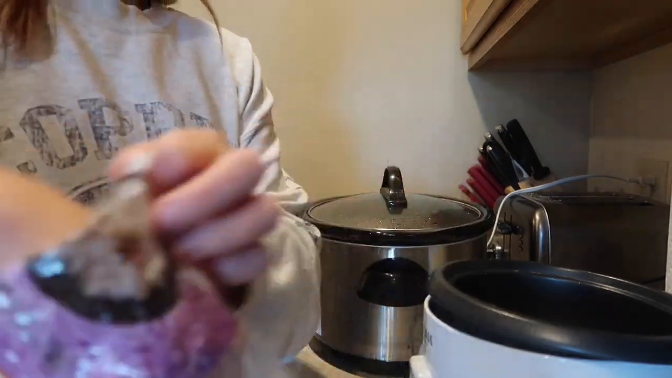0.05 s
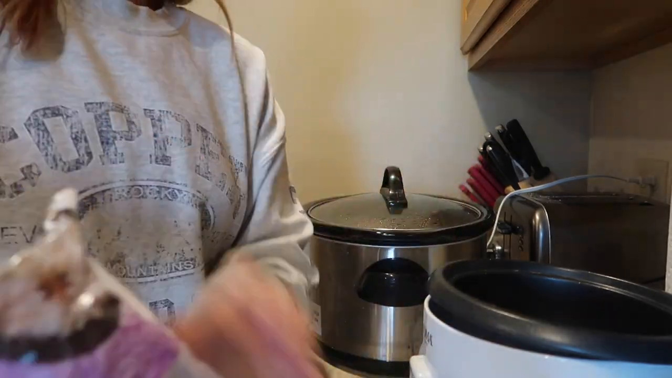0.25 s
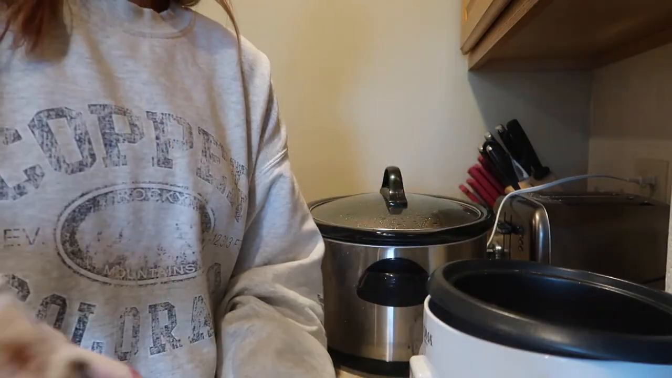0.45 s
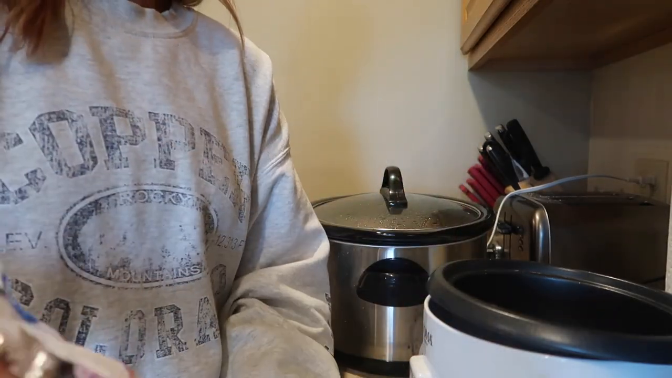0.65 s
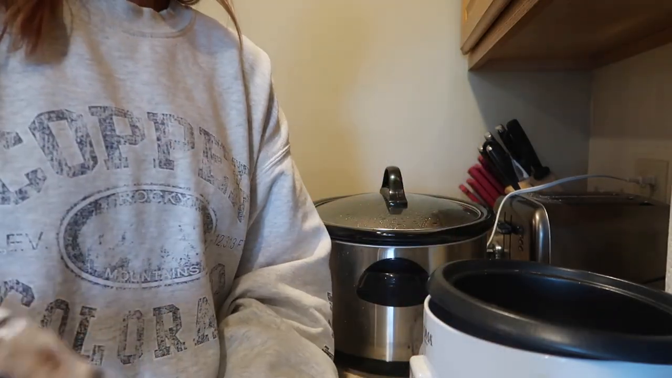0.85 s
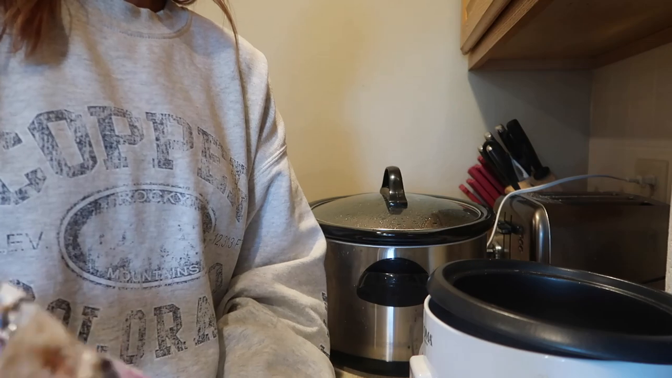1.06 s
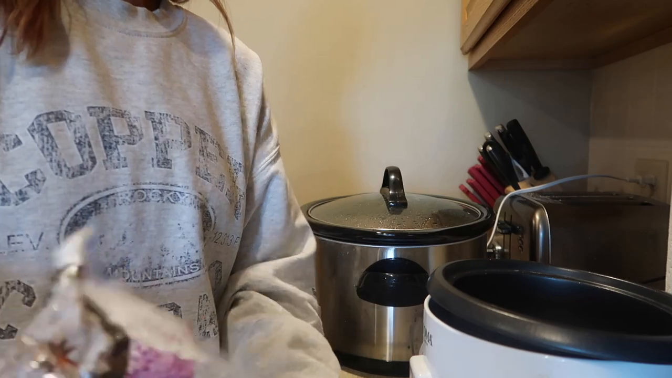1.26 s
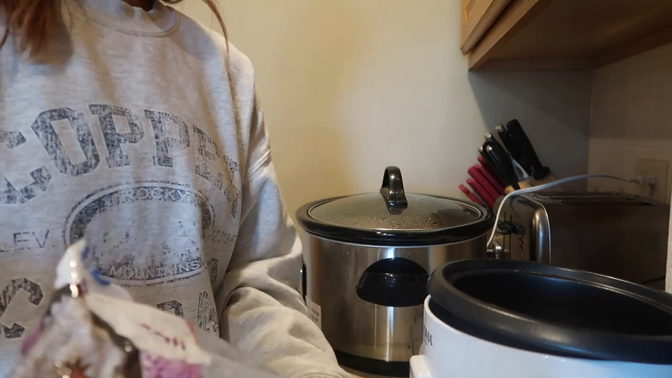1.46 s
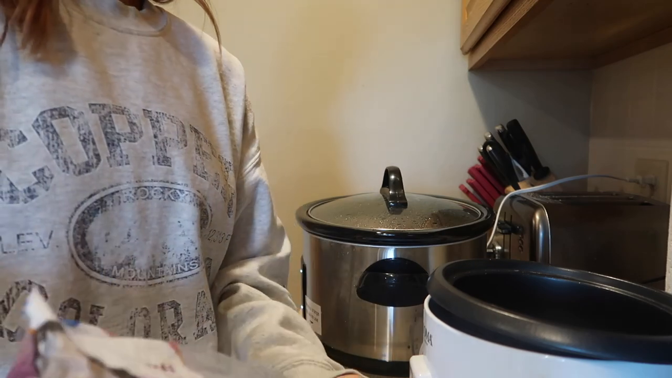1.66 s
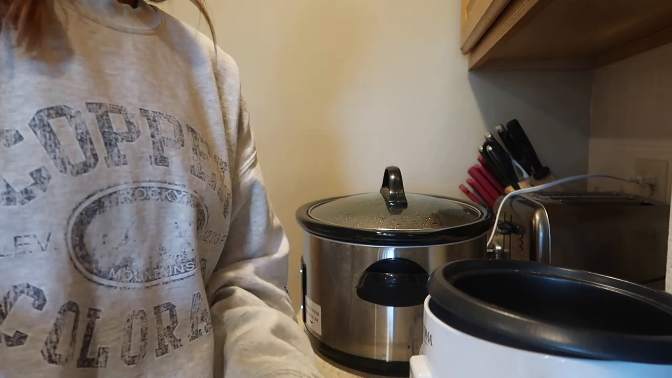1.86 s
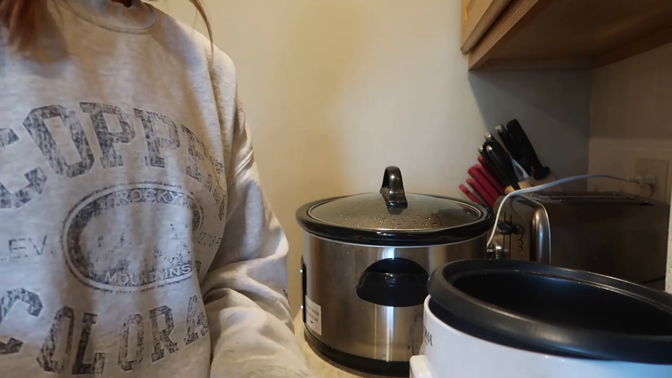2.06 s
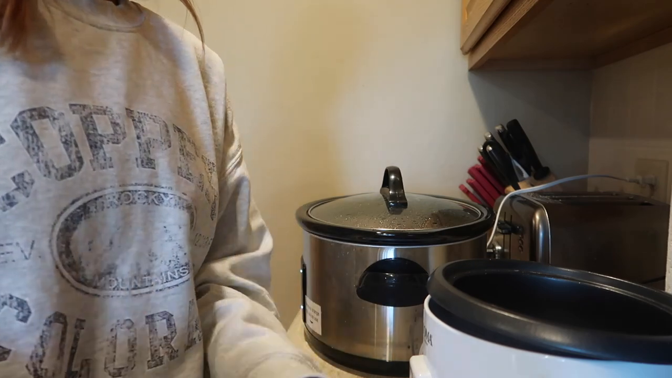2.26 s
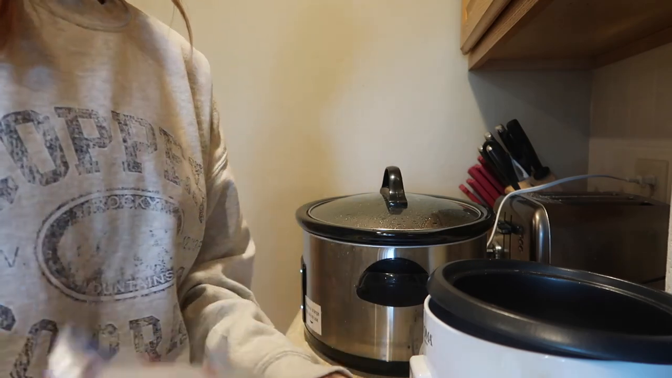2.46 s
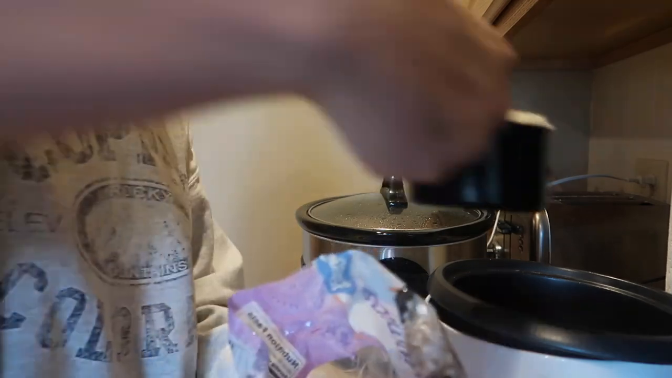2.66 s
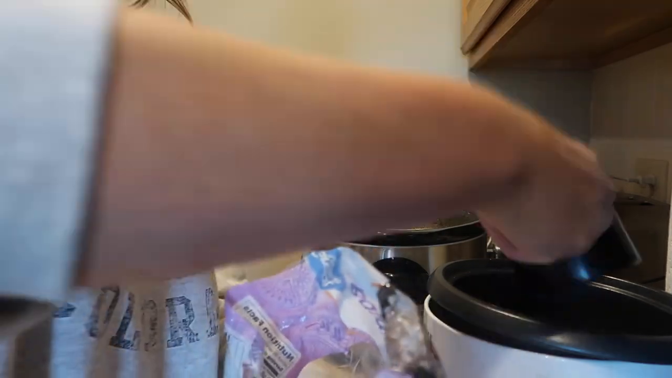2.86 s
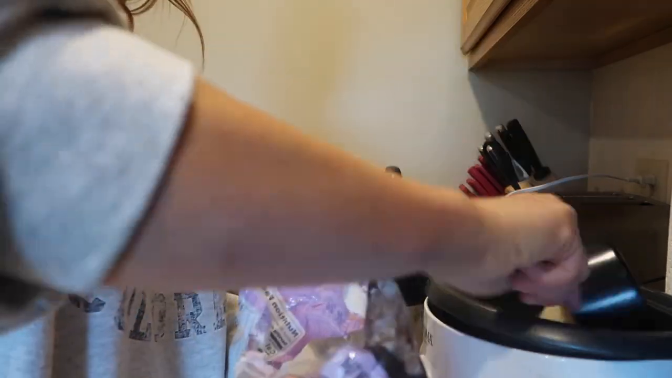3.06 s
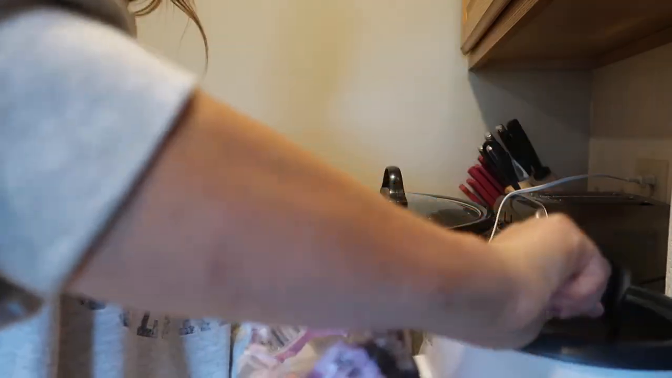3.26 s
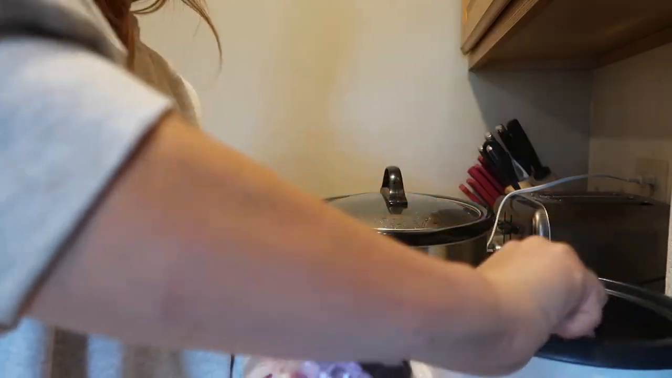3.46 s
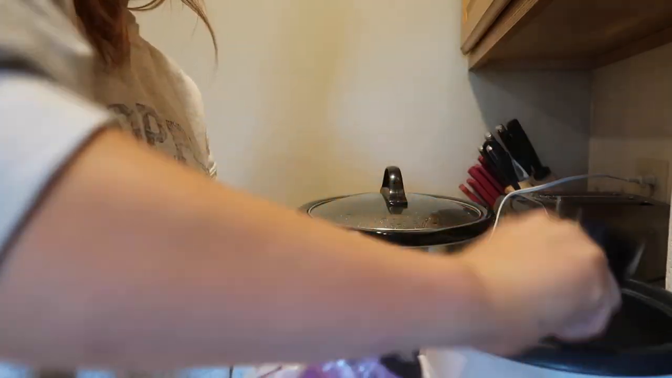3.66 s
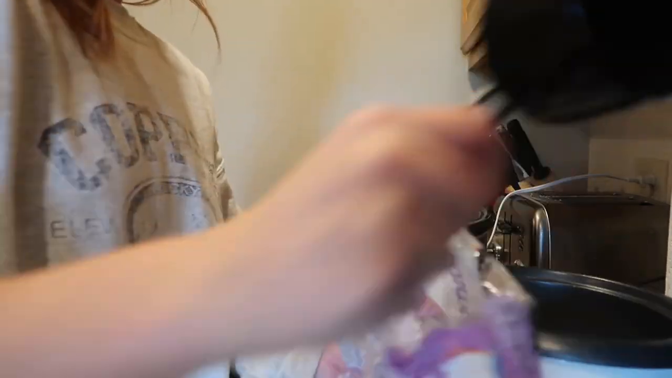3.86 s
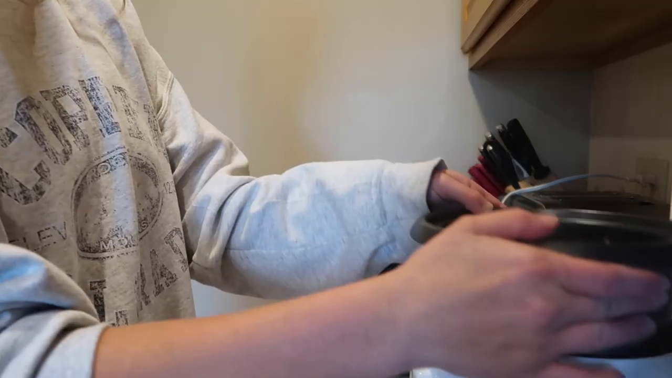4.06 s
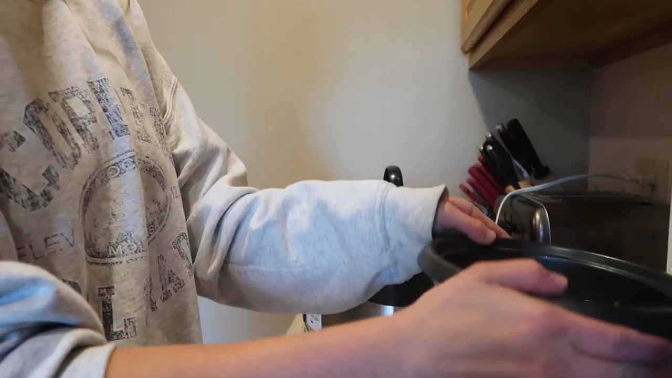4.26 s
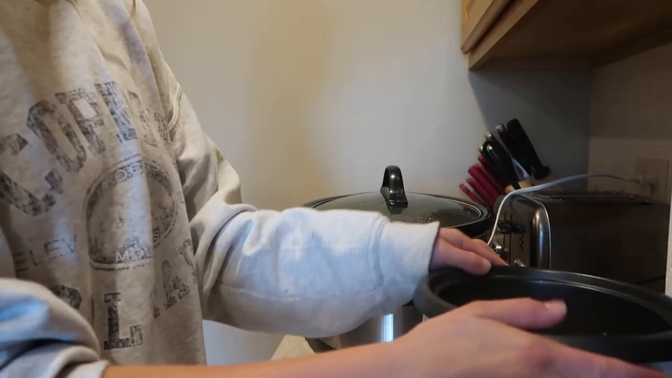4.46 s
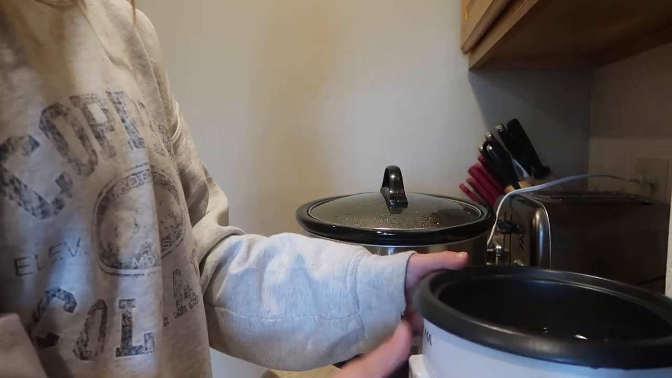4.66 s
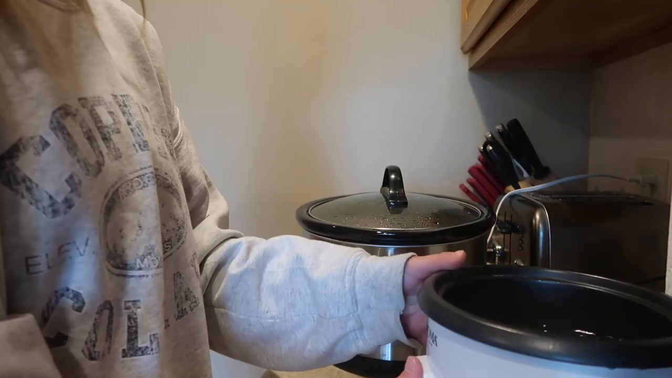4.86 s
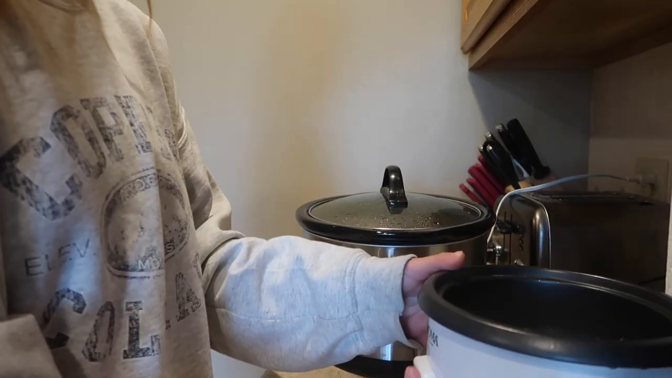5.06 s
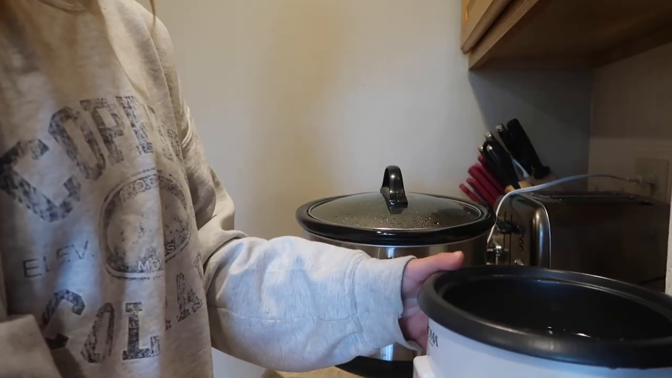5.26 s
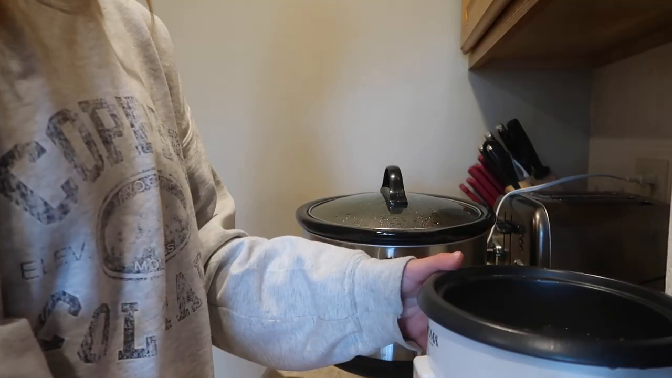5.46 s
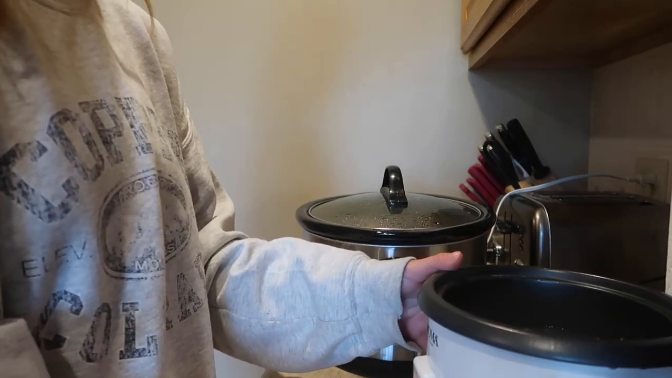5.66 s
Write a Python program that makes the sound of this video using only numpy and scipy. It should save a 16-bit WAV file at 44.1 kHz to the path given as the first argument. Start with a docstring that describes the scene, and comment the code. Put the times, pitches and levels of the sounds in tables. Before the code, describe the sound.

Close in a small kitchen, a stiff plastic bag of dry rice crackles, snaps and creaks for almost three seconds as a cup digs in the churning grains. One quick cupful rattles into a metal pot with a faint ring. The cup taps and clatters down, then the pot drops into its cooker with clanks and a low thud. Sparse light touches and a final knock follow over faint air and hum.

```python
"""A plastic bag of dry rice crinkles and creaks from clicks, buckling facets and stick-slip, as a cup digs in it.
At 3 s the cupful falls into the metal pot of a rice cooker: showers of tiny impacts ring its modes, then land dull.
The cup taps the rim, the last grains hiss out, and the cup is put down with noise cracks and short rings.
From 4 s the pot is lifted and dropped back into its housing: a clank of noise and modes, and a low-passed thud.
A hand slides on the shell before a last knock; faint room air and an appliance's hum last throughout."""
import sys
import numpy as np
from scipy import signal
from scipy.fft import rfft, irfft
from scipy.io import wavfile
from scipy.ndimage import uniform_filter1d

SR = 44100
rng = np.random.default_rng(int(sys.argv[2]) if len(sys.argv) > 2 else 0)


def materialize(psi):
    """Save the field psi as 16-bit PCM at rate SR to the path in sys.argv[1].

    A 1-D psi becomes a single channel; in a 2-D psi each row is a channel.
    """
    bounded = np.clip(np.atleast_2d(psi).T, -1, 1)
    quanta = np.round(bounded * 32767).astype(np.int16)
    wavfile.write(sys.argv[1], SR, quanta)


N = 251370
TIME = np.arange(N) / SR  # s


# how bright the film sounds: (f/Hz, level/dB)
FILM_SPECTRUM = [(300, -3), (700, -1.5), (1100, -4), (2200, 2.5), (3200, -4), (4500, -12.5), (7000, -20),
                 (10000, -33.5), (12500, -88.5), (15500, -78)]
# how the churning rice sounds: (f/Hz, level/dB)
CHURN_SPECTRUM = [(150, -25.5), (250, -5), (380, 2.5), (520, 3.5), (660, 8), (800, -5), (1100, 1),
                  (1800, -60)]
# the low rumble of the hands: (f/Hz, level/dB)
RUMBLE_SPECTRUM = [(25, -19.5), (55, -10), (90, -8.5), (135, 5), (190, 3.5), (260, -20.5), (500, -70)]


def bag():
    """The film crackles and pops; the rice churns under the cup and its shifting weight rumbles."""
    film_gain, rice_gain = effort()
    creases = crackle(rate=850, spread_db=2.0, spectrum=FILM_SPECTRUM, patchy_db=3.5)
    creases = creases + undb(2.5) * pops(pitch_hz=2110, octaves=0.47, spread_db=4.0)
    rice = undb(-2.0) * crackle(rate=1100, spread_db=6.5, spectrum=CHURN_SPECTRUM, patchy_db=3.5)
    rumble = undb(-13.0) * unit(colour(rng.standard_normal(N), RUMBLE_SPECTRUM))
    fits = undb(1.53 * walk(TIME, 110))  # the film yields in fits and starts
    return undb(-1.0) * film_gain * fits * creases + rice_gain * (rice + rumble)


# the hand's light, steady work on the bag between squeezes: (t/s, crackle level/dB)
HANDLING = [(0.0, -23.5), (0.37, -39.5), (0.46, -31), (1.03, -32.5), (2.3, -27), (2.58, -30), (2.68, -45),
            (3.04, -47)]
HANDLING_RICE_DB = -3.5  # rice gain relative to the film gain
# the bag is squeezed or dug into:
# (start t/s, time from start to fall t/s, crackle level/dB, rice level relative to it/dB)
SQUEEZES = [(0.0, 0.12, -24, -40), (0.17, 0.056, -22.5, -28), (0.292, 0.0094, -28.5, -8),
            (0.563, 0.056, -25.5, -8), (0.759, 0.052, -18.5, -13), (0.85, 0.12, -25.5, -3.5),
            (1.064, 0.083, -33.5, 13.5), (1.312, 0.1, -27.5, -2), (1.524, 0.02, -26, 0.5),
            (1.619, 0.15, -24.5, -2.5), (1.913, 0.011, -22, -13), (2.038, 0.18, -28, 2),
            (2.391, 0.052, -27, 1), (2.433, 0.0078, -30.5, 5.5), (2.736, 0.0038, -22.5, -0.5),
            (2.971, 0.064, -39.5, 6), (3.671, 0.033, -29.5, -1.5), (3.73, 0.16, -33, -7.5),
            (3.914, 0.02, -31, 0.5)]
SQUEEZE_ATTACK_S, SQUEEZE_FALL_DB_PER_S = 0.0029, 353


def effort():
    """Gains of film and rice: steady handling with every squeeze on top, added in power."""
    steady = gain_curve(HANDLING)
    film_power = steady ** 2
    rice_power = (undb(HANDLING_RICE_DB) * steady) ** 2
    for s, hold, db, rice_db in SQUEEZES:
        squeeze = swell(s, hold, db, SQUEEZE_ATTACK_S, SQUEEZE_FALL_DB_PER_S)
        film_power = film_power + squeeze ** 2
        rice_power = rice_power + (undb(rice_db) * squeeze) ** 2
    return np.sqrt(film_power), np.sqrt(rice_power)


def pops(pitch_hz, octaves, spread_db, count=900):
    """Small facets of every size flip at random moments."""
    out = np.zeros(N)
    times = rng.random(count) * N / SR
    for s, (width, strength) in zip(times, rng.standard_normal((count, 2))):
        hz = np.clip(pitch_hz * 2 ** (octaves * width), 500, 7000)
        add(out, s, undb(spread_db * min(strength, 2)) * facet(hz, cycles=11))
    return out


def facet(hz, cycles, size=2048):
    """A patch of film flips over and swings for a few cycles."""
    swing = np.sin(2 * np.pi * hz * TIME[:size])
    soft_start = 1 - fade(0.0017, size)
    return crest(fade(cycles / hz, size) * swing * soft_start)


# the loudest creases snapping through: (t/s, level/dB, f/Hz, sharp tick level/dB)
SNAPS = [(0.044, -11, 2520, 5), (0.101, -3, 2670, -19), (0.106, -10, 2390, -18), (0.164, -3.5, 2860, -21),
         (0.191, -4.5, 2160, -14), (0.218, 0, 2290, -4.5), (0.301, -10, 2460, 6.5), (0.333, -22, 2430, 12),
         (0.395, -10.5, 2180, 15), (0.772, -5, 2320, -19), (0.794, -2, 1570, -22), (0.932, -7.5, 2300, 8.5),
         (0.956, 2, 2480, -20), (0.981, -10, 1530, 5), (1.073, -7, 2030, -9.5), (1.089, 2, 2190, -25),
         (1.212, -10, 2400, -14), (1.365, -2, 2230, -22), (1.517, -6.5, 2200, -32),
         (1.536, -4.5, 2300, -11), (1.658, -1, 2430, -10), (1.7145, -8.5, 1970, -12), (1.743, -6, 2270, -3),
         (1.749, -2.5, 2320, -21), (1.757, -6, 2440, -32), (1.855, -1.5, 2450, 2.5), (1.929, -1, 2450, 8),
         (1.943, -8.5, 2200, 0), (1.976, -9.5, 2090, -3), (2.032, -3, 2110, -5), (2.042, -12, 2500, 16.5),
         (2.067, 2, 2840, -30), (2.102, -6.5, 2490, -30), (2.127, -2.5, 1970, -27), (2.161, -5.5, 2020, 3),
         (2.168, -16, 2330, 19), (2.23, -7, 2070, -2), (2.272, -10.5, 2500, 3), (2.385, -15, 2640, 16),
         (2.413, -3.5, 2670, -1), (2.447, 2.5, 2980, -10), (2.761, -4.5, 2730, -30),
         (2.821, -12.5, 1930, -3.5), (2.979, -14.5, 2670, -14.5)]
REBOUND_S, REBOUND_DB = 0.004, -14  # time scale of the flick back; its level on top of the snap's


def snaps(size=2048):
    """A crease buckles: its facet swings, the edge ticks, it flicks back detuned and neighbours follow."""
    out = np.zeros(N)
    tick_spectrum = [(200, -1.0), (900, 5.5), (3000, -2.5), (6000, -11.5), (10000, -18.5), (15000, -46.0)]
    for s, db, hz, tick_db in SNAPS:
        tick = rng.standard_normal(size) * fade(0.007, size)
        sharp = crest(colour(tick, tick_spectrum))
        neighbours = crest(colour(rng.standard_normal(size) * fade(0.012, size), FILM_SPECTRUM))
        snap = facet(hz, cycles=12.4) + undb(tick_db - 4.0) * sharp + undb(-5.5) * neighbours
        add(out, s + 0.0005, undb(db - 5.5) * snap)
        wait, detune = rng.uniform(0.459, 1.8), rng.standard_normal()
        rebound = facet(hz * 2 ** (0.41 * detune), cycles=4.1)
        add(out, s + REBOUND_S * wait, undb(db + REBOUND_DB) * rebound)
    return out


# taut film creaks as it drags, and once a fingertip on the pot:
# (start t/s, time from start to fall t/s, level/dB, f/Hz, glide/octaves per s)
CREAKS = [(0.168, 0.053, -25.5, 406.4, -2.5), (0.529, 0.058, -27, 1075, 0.2), (0.91, 0.035, -27, 1075, -1),
          (4.96, 0.077, -62.5, 2090, 0)]
CREAK_SLIPS_PER_S, CREAK_CYCLES = 590, 30  # mean slip rate; cycles until a slip's ring is 60 dB down


def creaks(size=8192, count=120):
    """A dragged surface sticks and slips; each slip plucks one tight resonance, gliding with tension."""
    out = np.zeros(N)
    t = TIME[:size]
    for s, hold, db, hz, glide in CREAKS:
        waits, strengths = rng.uniform(0.4, 1.6, (2, count))
        at = (np.cumsum(waits) / CREAK_SLIPS_PER_S * SR).astype(int)
        wandering_phase = np.exp(1j * 0.72 * walk(t, 250))
        slips = np.bincount(at, strengths, size)[:size] * wandering_phase
        swing = signal.fftconvolve(slips, fade(CREAK_CYCLES / hz, size))[:size]
        carrier = np.exp(2j * np.pi * np.cumsum(hz * 2 ** (glide * t)) / SR)
        tone = unit(np.real(swing * carrier))
        add(out, s, tone * swell(0, hold, db, attack_s=0.026, fall_db_per_s=554)[:size])
    return out


# the high metallic resonances under the grains: (f/Hz, level/dB, time to fall 60 dB t/s)
METAL_MODES = [(3270, 4, 0.13), (3775, 3, .11), (4730, 0, 0.1), (5970, -2, 0.2), (5900, -3, 0.14),
               (7100, 1, 0.14), (8500, -10, .12), (10989, -8, 0.16)]
# the grains' patter on the wall, in its broad resonances: (f/Hz, level/dB)
PATTER_SPECTRUM = [(500, -23), (1250, -1), (1700, -7.5), (2300, -0.5), (2900, -1.5), (3750, 4.5),
                   (4200, -9.5), (4850, -2.5), (5400, -13), (6000, -6), (6600, -12), (15000, -48)]
# grains ticking on each other: (f/Hz, level/dB)
TICKS_SPECTRUM = [(3000, -3), (5200, 3), (6500, 6.5), (9000, 7.5), (12300, 6), (13500, -14), (15500, -45.5)]
# a tap on the rim shakes a clump onto the heap: (start t/s, time from start to fall t/s, level/dB)
CLUMP = (3.337, 0.029, -33.5)
# the cupful falls at once, then thins out
POUR_START_S, POUR_ATTACK_S, POUR_HOLD_S, POUR_FALL_DB_PER_S = 3.05, 0.00043, 0.018, 93
# drive at full flow, ahead of the layers' mix levels: on bare metal, on each other, on the heap
METAL_DB, TICKS_DB, HEAP_DB = -19.5, -24.5, -11
# the heap covers the bottom of the pot
HEAP_FORMS_S, HEAP_GROWS_S, HEAP_MUFFLES_DB = 3.118, 0.011, -2.5


def pour():
    """Grains rain on bare metal and ring the pot, then land duller on their own heap."""
    flow = swell(POUR_START_S, POUR_HOLD_S, 0, POUR_ATTACK_S, POUR_FALL_DB_PER_S)
    covered = np.clip((TIME - HEAP_FORMS_S) / HEAP_GROWS_S, 0, 1)
    bare = flow * undb(HEAP_MUFFLES_DB * covered)
    metal = undb(METAL_DB) * bare
    ticks = undb(TICKS_DB) * bare
    clump = swell(*CLUMP, attack_s=0.0045, fall_db_per_s=350)
    heap = undb(HEAP_DB) * covered * flow ** 1.76 + clump
    impacts = metal * crackle(rate=3000, spread_db=-3.5, spectrum=[(500, -2), (13000, -0.089)])
    pot = ring(METAL_MODES)
    ringing = signal.fftconvolve(impacts, pot / np.linalg.norm(pot))[:N]
    patter = metal * crackle(rate=1500, spread_db=0.5, spectrum=PATTER_SPECTRUM, patchy_db=4.0)
    ticking = ticks * crackle(rate=2200, spread_db=1.0, spectrum=TICKS_SPECTRUM)
    landing = heap * crackle(rate=2700, spread_db=4.5, spectrum=CHURN_SPECTRUM)
    return undb(-12.5) * ringing + undb(-2.0) * patter + undb(-4.0) * ticking + undb(-5.5) * landing


# the landing heap and the cup's tap set the wall singing: (t/s, level/dB)
WALL_HITS = [(3.141, -42.5), (3.339, -49)]
# the pot's wall, ringing like a faint bell: (f/Hz, level/dB, time to fall 60 dB t/s)
WALL_MODES = [(1340, -2, 0.88), (1605, 5, 0.6), (1760, -4, 1.7), (2890, -9, 2.6)]
# the pot is not quite round: each mode beats with a weaker twin
WALL_BEAT_HZ, WALL_TWIN_DB = 9, -3  # mean beat rate; twin relative to its mode


def pot_wall(size=44100):
    """The pot's thin wall sings on faintly, beating, in a different mix after each hit."""
    out = np.zeros(N)
    for s, db in WALL_HITS:
        modes = [(hz, level + 2 * rng.standard_normal(), t60) for hz, level, t60 in WALL_MODES]
        twins = [(hz + WALL_BEAT_HZ * (0.5 + rng.random()), level + WALL_TWIN_DB, t60)
                 for hz, level, t60 in modes]
        add(out, s, undb(db) * ring(modes + twins, size))
    return out


# the rest slides out of the cup: (start t/s, time from start to fall t/s, level/dB)
LAST_GRAINS = (3.445, 0.072, -39)
# grains skidding out of the cup: (f/Hz, level/dB)
SLIP_SPECTRUM = [(1000, -16), (5600, -10), (6300, -0.5), (9000, -5), (12000, -7), (13000, -22),
                 (15500, -47)]


def last_grains():
    """The last grains skid out of the cup with a thin hiss, coloured by a few high metallic resonances."""
    level = swell(*LAST_GRAINS, attack_s=0.039, fall_db_per_s=307)
    grains = level * crackle(rate=900, spread_db=3.5, spectrum=SLIP_SPECTRUM)
    resonances = ring(METAL_MODES)
    return grains + undb(-10) * signal.fftconvolve(grains, resonances / np.linalg.norm(resonances))[:N]


# the cup clacking on rim and counter: (t/s, level/dB, brightness/dB per decade, ring relative to the crack/dB)
CUP_KNOCKS = [(2.743, -10.5, -2, -31), (3.339, -10, -3, -10.5), (3.636, -19.5, -6, -11),
              (3.676, -4, 9.5, -4.5), (3.691, -10.5, -9, -8), (3.755, -15, 7, -31), (3.781, -9.5, 14, -21),
              (3.807, -7, 9, -18), (3.842, -2.5, 3, -17), (3.898, -9, -1, -16), (3.93, -4, 12, -29),
              (3.94, -12, 17, -14), (3.9497, 2, 2, -47)]
# the cup's crack: (f/Hz, level/dB)
CUP_CRACK_SPECTRUM = [(150, -30), (400, -3.5), (750, -1), (1200, 6.5), (2200, 3), (3200, -0.5),
                      (4500, -8.5), (6500, -17.5), (9500, -30), (15000, -58.5)]
# the cup's own ring: (f/Hz, level/dB, time to fall 60 dB t/s)
CUP_MODES = [(1110, 0, 0.16), (1287, 0.5, 0.17), (2200, 6, 0.071), (2400, 2, 0.13), (2900, -3, 0.17),
             (4950, -4, 0.12)]


def cup(size=16000):
    """The hard cup clacks: a crisp crack, a brief chatter and its own ring, damped by the hand."""
    out = np.zeros(N)
    for s, db, bright_db, ring_db in CUP_KNOCKS:
        contact = rng.standard_normal(size) * (fade(0.005, size) + undb(-12) * fade(0.074, size))
        crack = crest(colour(contact, tilt(CUP_CRACK_SPECTRUM, bright_db)))
        ringing = crest(ring(CUP_MODES, size))
        add(out, s + 0.0005, undb(db - 2.5) * (crack + undb(ring_db) * ringing))
    return out


# the pot knocking in its housing: (t/s, level/dB, brightness/dB per decade, weight behind the blow/0-1)
KNOCKS = [(4.089, -26.5, -7, 0.1), (4.273, -20.5, 4.5, 0.53), (4.445, -4.5, -6, 0.4),
          (4.459, -7.5, -5, 0.55), (4.482, -11, 2, 0.7), (4.508, -7.5, -2.5, 0.38),
          (4.586, -16, -1.5, 0.38), (4.652, -33.5, 4, 0.9), (4.822, -31.5, -18, 0.2),
          (4.931, -37.5, -1, 0.8), (5.071, -31, -35, 0.36), (5.549, -31, 40, 0.2), (5.651, -13, 14.5, 0.22)]
# the crack of a knock: (f/Hz, level/dB)
KNOCK_SPECTRUM = [(120, -22.5), (400, 5.5), (950, -3), (1350, 1.5), (2100, -2), (2900, -2), (3550, -2.5),
                  (3950, -1.5), (4300, -11.5), (6500, -14.5), (9500, -27), (15000, -84)]
# what the knocked cooker rings with: (f/Hz, level/dB, time to fall 60 dB t/s)
COOKER_MODES = [(402, 6, 0.11), (1070, 1, 0.36), (1297, 6, 0.24), (1436, 4.5, 0.24), (1790, -3, 0.19),
                (2210, 5, 0.17), (2630, 5.5, 0.12), (2757, -8, 0.059), (3215, 2, 0.074), (3940, 3.5, 0.065)]
CLATTER_T60_S, COOKER_RING_DB = 0.39, -6.5  # at full weight: clatter length; ring relative to the crack


def knocks(size=22050):
    """A crack and a dense clatter, longer with weight, ring the cooker differently every time."""
    out = np.zeros(N)
    for s, db, bright_db, weight in KNOCKS:
        clatter = undb(-13.5) * fade(CLATTER_T60_S * weight, size)
        contact = rng.standard_normal(size) * (fade(0.016, size) + clatter)
        crack = crest(colour(contact, tilt(KNOCK_SPECTRUM, bright_db)))
        # a new grip on the pot shifts its modes a little
        gripped = [(hz * (1 + 0.0074 * rng.standard_normal()), level, t60)
                   for hz, level, t60 in COOKER_MODES]
        ringing = crest(signal.fftconvolve(contact, ring(gripped))[:size])
        add(out, s + 0.000971, undb(db - 1.0) * (crack + weight * undb(COOKER_RING_DB) * ringing))
    return out


# bag, rice or pot coming to rest on the counter: (t/s, level/dB, softness f/Hz)
THUDS = [(0.93, -11, 170), (0.998, -20.5, 175), (1.079, -17, 450), (1.148, -21.5, 510), (3.169, -20, 445),
         (3.975, -16.5, 900), (4.466, -22, 222), (4.509, -6.5, 244), (4.546, -16, 258), (4.822, -33.5, 460),
         (5.068, -35, 476), (5.651, -21.5, 300)]
BLOW_THUD_DB, BLOW_THUD_HZ = -5, 297  # full-weight thud relative to the knock's listed level; softness


def thuds():
    """Every landing thuds, and so does every knock, by the weight behind it."""
    out = np.zeros(N)
    for s, db, soft_hz in THUDS:
        add(out, s, undb(db) * thud(soft_hz))
    for s, db, _, weight in KNOCKS:
        add(out, s, weight ** 2 * undb(db + BLOW_THUD_DB) * thud(BLOW_THUD_HZ))
    return out


# counter and housing: (f/Hz, level/dB, time to fall 60 dB t/s)
COUNTER_MODES = [(120, -4, 0.4), (155, 4, 0.18), (233, -2.5, 0.15), (406, -1, 0.19), (514, -5.5, 0.24),
                 (628, -1, 0.16)]


def thud(soft_hz, size=22050):
    """Weight shakes counter and housing; a soft landing leaves only the lowest modes."""
    shudder_spectrum = [(30, -54), (75, -27), (120, 0.5), (320, -4.0), (600, -3.0), (1200, -13.0)]
    shudder = crest(colour(rng.standard_normal(size) * fade(0.27, size), shudder_spectrum))
    soft_start = 1 - fade(0.006, size)
    body = (crest(ring(COUNTER_MODES)) + undb(4.5) * shudder) * soft_start
    return crest(signal.sosfilt(signal.butter(3, soft_hz, fs=SR, output="sos"), body))


# a hand sliding on the housing: (start t/s, time from start to fall t/s, level/dB)
SLIDE = (5.44, 0.13, -46)


def slide():
    """Skin scrapes faintly and unevenly over the cooker's shell."""
    level = swell(*SLIDE, attack_s=0.13, fall_db_per_s=165) * undb(1.4 * walk(TIME, 40))
    skin_spectrum = [(1000, -18), (3200, 7.5), (8000, 13.5), (14000, -24)]
    return level * crackle(rate=750, spread_db=6.0, spectrum=skin_spectrum)


# how long the room rings: (f/Hz, time to fall 60 dB t/s)
ROOM_T60 = [(100, 0.44), (1500, 0.67), (4000, 0.44), (12000, 0.62)]


def kitchen(x, early_db, late_db, size=26000, count=64):
    """Counter and cupboards reflect at once, changing as hands and things move; the room rings on."""
    t = TIME[:size]
    hop = N // count
    near_t = t[:hop]
    low_cut = signal.butter(1, 220, "high", fs=SR, output="sos")
    out = x.copy()
    # overlapping stretches of sound, each with new reflections
    for start in range(-hop, N, hop):
        i = np.arange(max(start, 0), min(start + 2 * hop, N))
        echoes = rng.standard_normal(hop) ** 3 * fade(0.034, hop) * (near_t > 0.0015)
        early = signal.sosfilt(low_cut, echoes)
        stretch = x[i] * np.sin(np.pi * (i - start) / (2 * hop))
        add(out, i[0] / SR, undb(early_db) * signal.fftconvolve(stretch, early / np.linalg.norm(early)))
    late = sum(signal.sosfilt(sos, rng.standard_normal(size)) * fade(over_hz(hz, ROOM_T60), size)
               for hz, sos in bands())
    late = late * (t > 0.007)
    return out + undb(late_db) * signal.fftconvolve(x, late / np.linalg.norm(late))[:N]


# the microphone pair: (f/Hz, side minus mid level/dB, diffuse share/0-1)
PORTS = [(120, -66, 0.78), (400, -28, 0.78), (1500, -32, 0.68), (2860, -20, 0), (4020, -3, 0.1),
         (6500, -0.5, 0.5), (9300, 9, 1), (13000, 16.5, 0.3)]


def microphones(x, size=2000):
    """Two close ports: alike in the bass, further out of phase and partly diffuse in the treble."""
    hz = np.fft.rfftfreq(2 * N, 1 / SR)
    # as things move, the scattered sound reaches the ports with a wandering phase
    wander = np.cumsum(rng.standard_normal(N)) * 0.03
    moving = np.real(signal.hilbert(x) * np.exp(1j * wander))
    scatter = rng.standard_normal(size) * fade(0.04, size)
    scattered = rfft(moving, 2 * N) * rfft(scatter / np.linalg.norm(scatter), 2 * N)
    diffuse = np.clip(over_hz(hz, PORTS, axis=2), 0, 1)
    direct = -1j * rfft(x, 2 * N)  # a quarter cycle out of phase
    difference = np.sqrt(1 - diffuse) * direct + np.sqrt(diffuse) * scattered
    side = irfft(difference * undb(over_hz(hz, PORTS)))[:N]
    return np.array([x + side, x - side])


# the room's steady air: (f/Hz, level/dB)
AIR_SPECTRUM = [(25, -2), (60, 3.5), (160, -0.5), (300, -6), (700, -14.5), (2000, -20), (5000, -24),
                (11000, -39.5), (14000, -66)]
# an appliance: (f/Hz, level/dB)
HUM = [(119, -57), (174, -55)]


def room_tone():
    """Faint steady air, alike on both sides only in the bass, and an appliance's wavering hum."""
    mid, side = (unit(colour(rng.standard_normal(N), AIR_SPECTRUM)) for _ in range(2))
    side = signal.sosfilt(signal.butter(2, 450, "high", fs=SR, output="sos"), side)
    air = mid + undb(-2.5) * side * np.array([[1], [-1]])
    waver = unit(colour(rng.standard_normal(N), RUMBLE_SPECTRUM))
    hum = np.zeros(N)
    for hz, db in HUM:
        phase = 2 * np.pi * np.cumsum(hz * (1 + 0.33 * waver)) / SR
        hum += undb(db) * np.sqrt(2) * np.sin(phase)
    return undb(-50.0) * air + hum


def crackle(rate, spread_db, spectrum, patchy_db=0.0, size=1100, count=60000):
    """Tiny clicks of uneven strength and shifting colour; even in level over longer stretches."""
    used = slice(int(rate * N / SR))  # rate in clicks per second
    where = rng.integers(0, N, count)[used]
    strength = undb(spread_db * np.minimum(rng.exponential(size=count)[used], 2 * np.e))
    out = np.zeros(N)
    for _, sos in bands():
        patches = undb(patchy_db * walk(TIME[where], 35))
        sizes = strength * rng.standard_normal(count)[used] * patches
        out += signal.sosfilt(sos, np.bincount(where, sizes, N) + 1e-18)
    out = colour(out, spectrum)
    return out / np.sqrt(uniform_filter1d(out ** 2, size) + 1e-18)


def ring(modes, size=22050):
    """Modes struck once, each with a chance sign."""
    out = np.zeros(size)
    for sign, (hz, db, t60) in zip(rng.choice([-1, 1], len(modes)), modes):
        out += sign * undb(db) * fade(t60, size) * np.sin(2 * np.pi * hz * TIME[:size])
    return out


def swell(start, hold, db, attack_s, fall_db_per_s):
    """Gain of one gesture: it rises from the start and dies away once the hold time has passed."""
    t = TIME - start
    return np.clip(t / attack_s, 0, 1) ** 2 * undb(db - fall_db_per_s * np.maximum(t - hold, 0))


def gain_curve(table):
    """Gain from a table of times and decibels, fading out beyond the table's ends."""
    s, db = np.transpose(table)
    outside = np.maximum(s[0] - TIME, 0) + np.maximum(TIME - s[-1], 0)
    return undb(np.interp(TIME, s, db)) * np.exp(-outside / 0.0037)


def walk(times, rate):
    """A smooth random wander with a spread of about 1, read at the given times."""
    steps = rng.standard_normal(1000)
    return np.interp(times * rate, np.arange(len(steps)), steps)


def tilt(spectrum, bright_db):
    """Tilt a spectrum around 2000 Hz by so many decibels per decade."""
    return [(hz, level + bright_db * np.log10(hz / 2000)) for hz, level in spectrum]


def colour(x, spectrum, size=2048):
    """Causal minimum-phase filter with the given spectrum."""
    level_db = over_hz(np.fft.rfftfreq(size, 1 / SR), spectrum)
    cepstrum = irfft(np.log(undb(level_db)))
    # folding the cepstrum forward puts the energy at the start
    cepstrum[1:size // 2] *= 2
    cepstrum[size // 2 + 1:] = 0
    return signal.fftconvolve(x, irfft(np.exp(rfft(cepstrum))))[:len(x)]


def bands(count=11):
    """Centres and filters of adjoining bands across the audible range."""
    edges = np.geomspace(60, 17000, count + 1)
    return [(np.sqrt(a * b), signal.butter(2, [a, b], "band", fs=SR, output="sos"))
            for a, b in zip(edges, edges[1:])]


def over_hz(hz, table, axis=1):
    """Read a column of a table on a log-frequency axis."""
    rows = np.transpose(table)
    return np.interp(np.log(np.maximum(hz, 1)), np.log(rows[0]), rows[axis])


def fade(t60, size):
    """Exponential decay by 60 dB in t60 seconds."""
    return np.exp(-np.log(1000) * TIME[:size] / max(t60, 1 / SR))


def undb(db):
    """Decibels to gain."""
    return 10 ** (np.asarray(db) / 20)


def unit(x):
    """Scale to rms 1."""
    return x / np.sqrt(np.mean(x ** 2))


def crest(x):
    """Scale to peak 1."""
    return x / np.abs(x).max()


def add(track, s, sound):
    """Mix a sound into a track at a time in seconds."""
    i = max(int(s * SR), 0)
    track[i:i + len(sound)] += sound[:N - i]


def scene():
    """Bag and cup sound drier, pot and cooker with more of the kitchen; the room tone lies beneath."""
    near = kitchen(bag() + snaps() + creaks() + cup(), early_db=-3.5, late_db=-12.5)
    pouring_sounds = pour() + pot_wall() + last_grains()
    housing_sounds = knocks() + thuds() + slide()
    cooker = kitchen(pouring_sounds + housing_sounds, early_db=-1.5, late_db=-7.0)
    return microphones(near + cooker) + room_tone()


def record(dry):
    """The deepest bass is thinned; the recorder clips at full scale and cuts the top."""
    thinned = signal.sosfilt(signal.butter(2, 42, "high", fs=SR, output="sos"), dry)
    clipped = np.clip(thinned, -1, 1)
    return signal.sosfilt(signal.ellip(8, 0.2, 80, 15800, fs=SR, output="sos"), clipped)


dry = scene()
out = record(dry)
materialize(out)
```